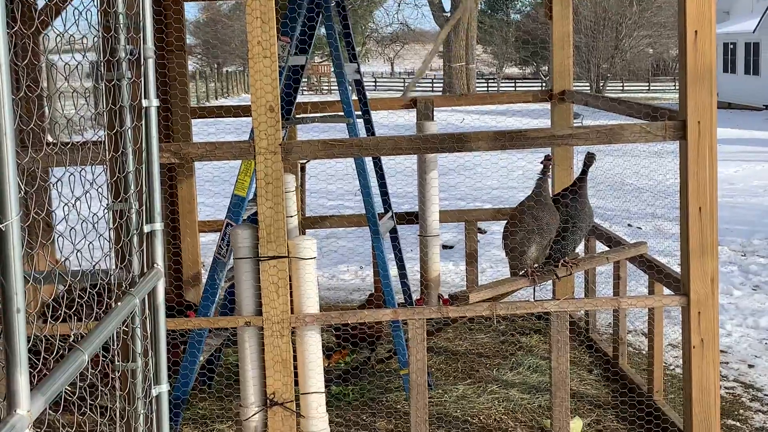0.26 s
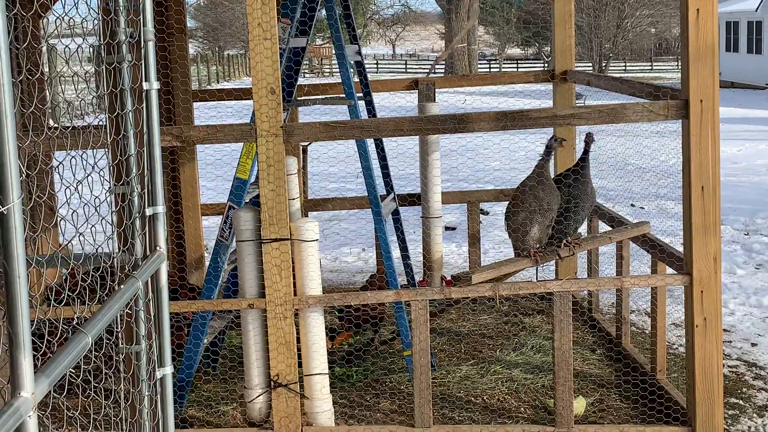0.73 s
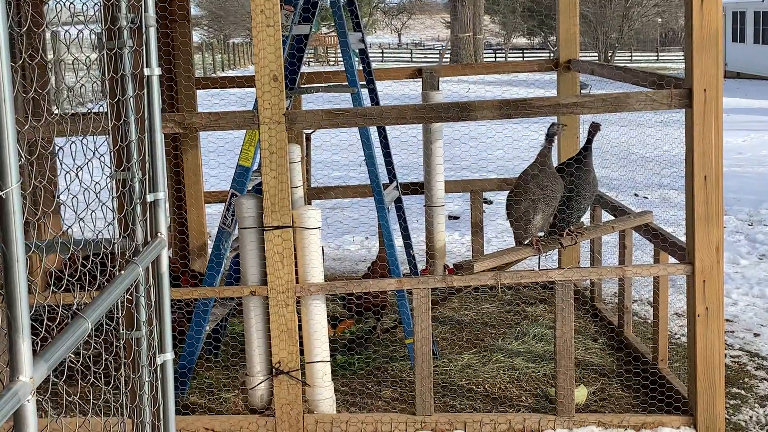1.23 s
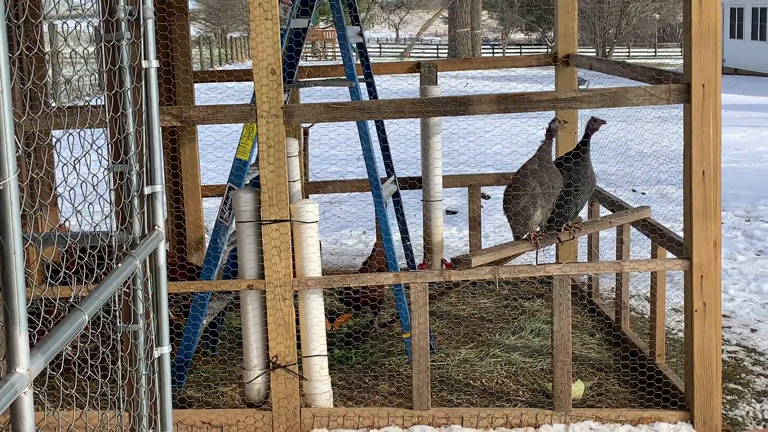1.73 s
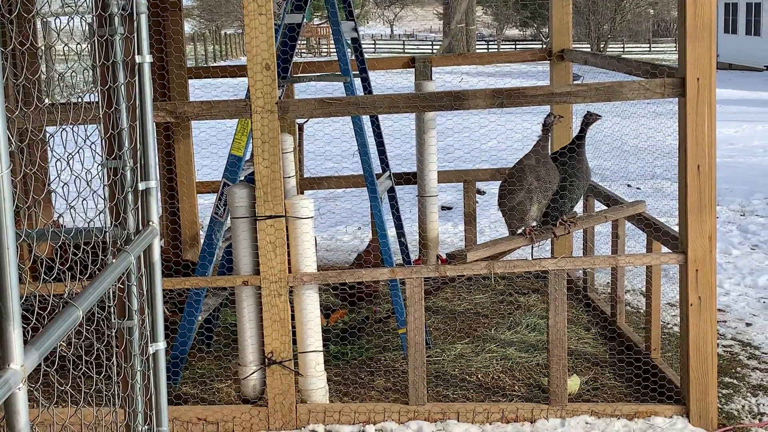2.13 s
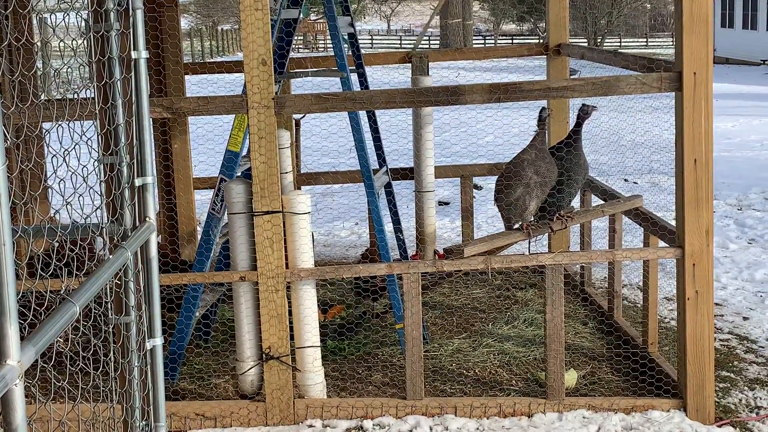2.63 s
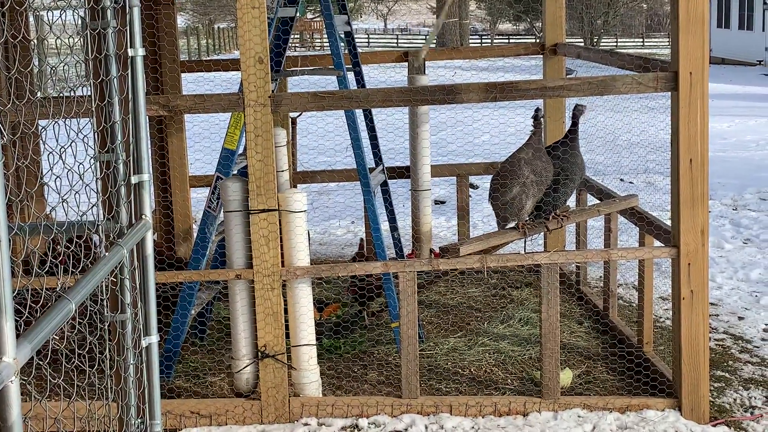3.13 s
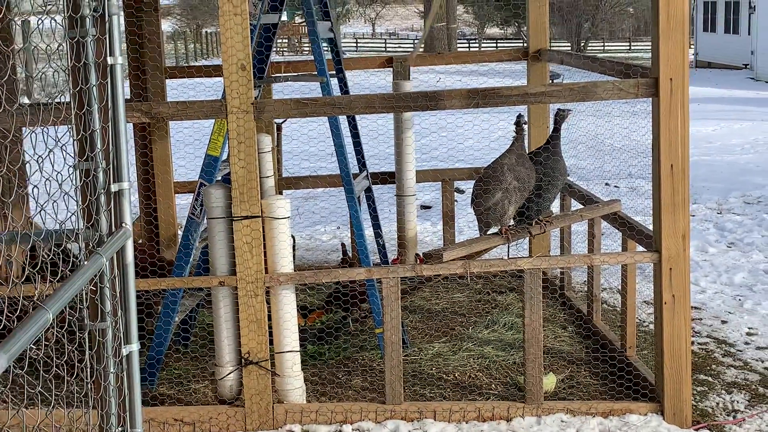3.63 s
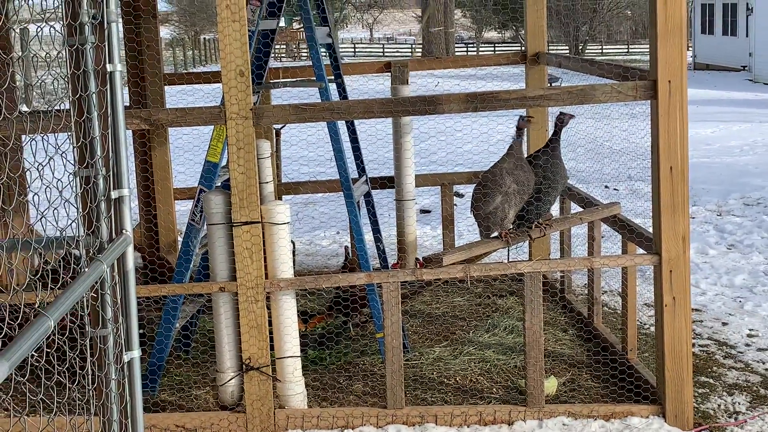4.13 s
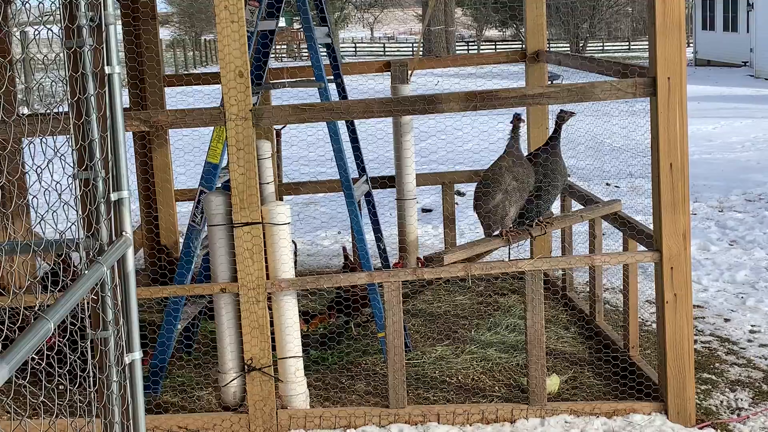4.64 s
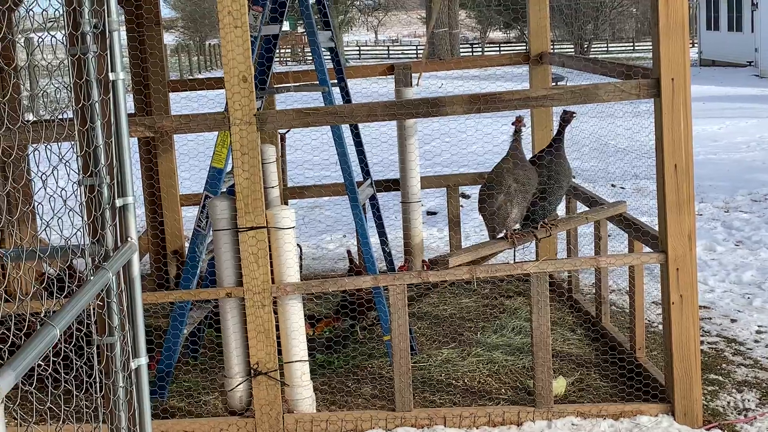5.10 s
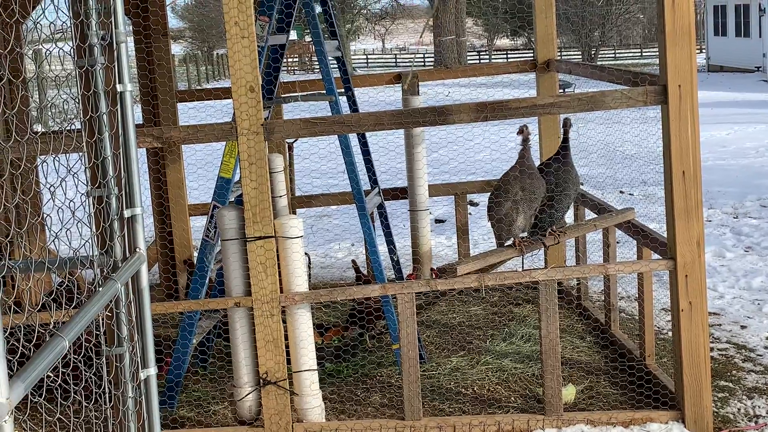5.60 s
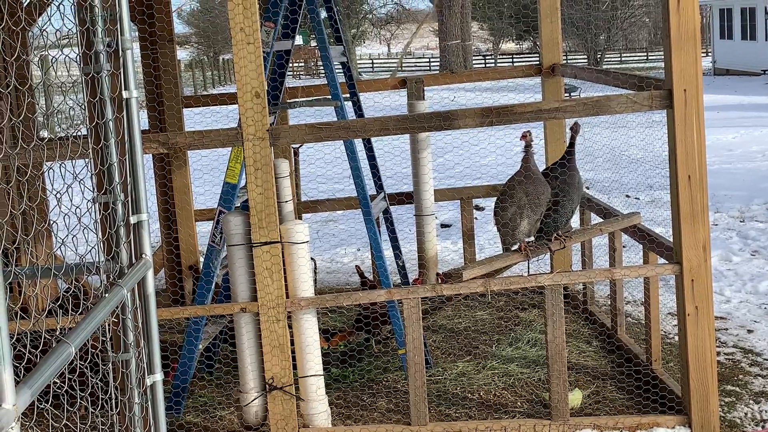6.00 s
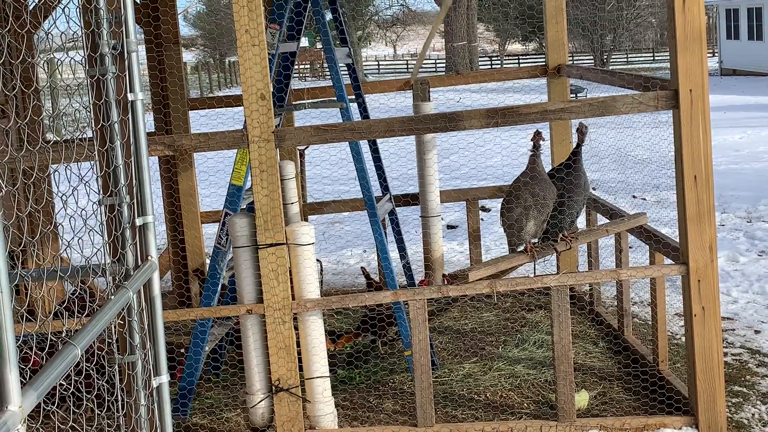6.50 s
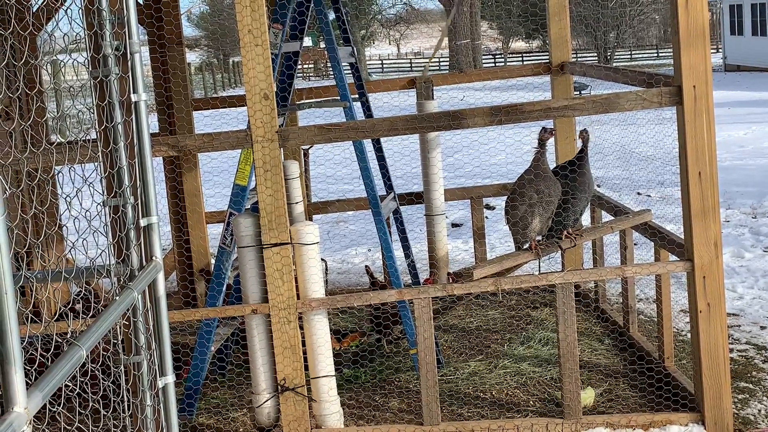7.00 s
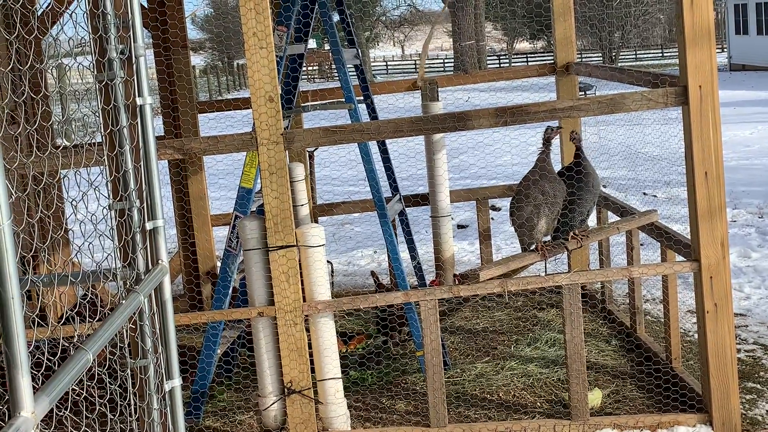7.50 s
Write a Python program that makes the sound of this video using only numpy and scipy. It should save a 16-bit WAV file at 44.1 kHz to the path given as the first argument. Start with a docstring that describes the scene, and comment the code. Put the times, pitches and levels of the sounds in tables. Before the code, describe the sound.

Raspy guinea fowl calls, about four or five a second, slacken and pick up again over regular soft hen squawks, wind rumble and small ticks.

```python
"""Light wind, lumpy low noise with gusts and falling pops, and faint yard air run from the start.
Guinea fowl on a rail in a wire run call harsh notes at once: uneven pulses with breath over a clean tone.
The wooden run answers briefly and the yard longer, as decaying noise tails.
Almost from the start a hen below squawks in a steady rhythm, with a few short clucks between: partials at
thirds of her pitch. From half a second on, small ticks come from close by: high-passed noise bursts."""
import sys
import numpy as np
from scipy import signal
from scipy.fft import rfft, irfft
from scipy.io import wavfile
from scipy.ndimage import uniform_filter1d, minimum_filter1d

SR = 44100
rng = np.random.default_rng(int(sys.argv[2]) if len(sys.argv) > 2 else 0)


def unload_wav(signal):
    """Save mono or channel-first audio to the path in sys.argv[1] as 16-bit WAV at rate SR, clipped to [-1, 1]."""
    wavfile.write(
        sys.argv[1],
        SR,
        np.round(np.clip(np.atleast_2d(signal).T, -1, 1) * 32767).astype(np.int16),
    )


N = 341775
TIME_S = np.arange(N) / SR
HZ = np.fft.rfftfreq(N, 1 / SR)

# Wind rumble between gusts. Each row: time in seconds, level in dB before the lumps.
WIND_LEVEL = [(0.0, -61), (0.64, -53), (0.99, -58), (1.68, -52.5), (2.16, -59.5), (2.65, -49), (3.5, -59.5),
              (5.85, -62.5), (6.02, -57.5), (7.75, -66)]
# Wind spectrum. Each row: frequency in Hz, relative level in dB.
WIND_SPECTRUM = [(11, 9), (18, -28), (38, -4), (59, 8), (98, 3), (254, -34.5), (273, -30.5), (300, -20.5),
                 (390, -44.5), (660, -120)]
# Gusts. Each row: start in seconds, level in dB before GUST_CREST_DB is taken off.
GUSTS = [(0.492, -34), (0.819, -44.5), (1.148, -41), (1.302, -43), (1.716, -37), (2.324, -45), (2.492, -38),
         (2.943, -31.5), (3.112, -41), (4.844, -45), (5.833, -49), (5.999, -56), (6.195, -49),
         (7.185, -46.5)]
# Gusts that pop on the ports. Each row: start in seconds, level in dB, time scale in seconds.
POPS = [(0.504, -47, 0.058), (1.741, -43.5, 0.058), (2.477, -40.5, 0.043), (2.903, -48, 0.05),
        (3.11, -50.5, 0.0554), (4.582, -59, 0.045)]
GUST_RISE_S, GUST_CREST_DB, LUMPY_DB = 0.02, 4.5, 6.5
POP_START_HZ = 249

# Yard air spectrum. Each row: frequency in Hz, relative level in dB.
AIR_SPECTRUM = [(90, -27.5), (150, -6), (260, -16.5), (400, -15), (600, -20.5), (900, -20), (2700, -13.5),
                (3500, -53), (6000, -25), (8500, -64.5), (10500, -26.5), (15700, -65)]
AIR_DB = -61

# Guinea fowl notes. Each row: time in seconds, nominal peak in dB, treble in dB, start pitch in Hz,
# growl at a third of the pitch in dB, rise in seconds, length in seconds.
GUINEA_NOTES = [(0.0161, -12.5, 1.5, 1145, -30, 0.02, 0.053), (0.1337, -15, 2.5, 1150, -21, .023, 0.064),
                (0.2801, -17.5, 9, 1070, -34.5, 0.012, .073), (0.5625, -14, 7, 1081, -43, 0.032, 0.087),
                (0.7258, -13, -2.5, 1096, -31, 0.025, 0.086), (0.8895, -17, 0.5, 1089, -29.5, 0.011, 0.099),
                (1.1138, -18.5, 1, 1071, -46, 0.021, 0.088), (1.305, -19, 2, 1072, -33.5, 0.036, .085),
                (1.491, -19.5, -2, 1083, -26, 0.038, 0.1), (1.7396, -20, -1, 1045, -43, .034, 0.082),
                (2.0884, -23, -1, 1022, -44.5, 0.014, 0.071), (2.3019, -18, -8, 1089, -29.5, 0.039, 0.082),
                (2.585, -23, -0.5, 1021, -46.5, 0.036, 0.089), (2.9374, -18, -7, 1066, -39.5, 0.046, 0.086),
                (3.7353, -20.5, 3, 1008, -54, 0.023, 0.078),
                (3.9475, -18.5, 1.5, 1094, -40.5, 0.038, 0.081),
                (4.156, -18.5, 2.5, 1076, -30.5, 0.026, 0.083), (4.4928, -21, 8, 1018, -49, 0.022, 0.088),
                (4.6464, -13.5, 5.5, 1086, -28.5, 0.027, 0.079),
                (4.819, -18.5, 6.5, 1131, -29.5, 0.021, 0.094), (4.9915, -18, 4, 1121, -27, .016, 0.09),
                (5.206, -16, 2.5, 1040, -29.5, .022, .09), (5.4096, -13.5, 2, 1072, -25.5, .023, 0.095),
                (5.619, -13.5, 5.5, 1081, -41, 0.026, 0.086), (5.929, -19, 5, 1019, -50.5, 0.013, .084),
                (6.1573, -15.5, 3, 1080, -31, 0.036, 0.11), (6.3864, -16.5, 4, 1090, -30, .023, 0.089),
                (6.6145, -16.5, 2.5, 1057, -28.5, .033, 0.093), (6.9234, -18, 3, 1034, -46.5, .025, 0.1),
                (7.163, -17, -.5, 1153, -26.5, 0.031, .098), (7.485, -23, -0.5, 1067, -24.5, 0.022, 0.073),
                (7.7455, -21, 4.5, 1163, -24, 0.041, 0.1)]
# Guinea fowl throat and microphone. Each row: frequency in Hz, relative gain in dB.
GUINEA_THROAT = [(150, -79), (250, -36), (379, 3), (695, -12.5), (949, -5.5), (1230, -9.5), (2030, -4.5),
                 (3420, -3), (4830, -2.5), (5360, -21.5), (6060, -33), (8560, -11.5), (10500, -11),
                 (13400, -35), (15700, -50)]
# Resonances on the way out. Each row: frequency in Hz, width in Hz, mean lift in dB.
RESONANCES = [(1536, 40, 7), (1738, 80, 7.5), (2296, 69, -1), (2652, 414, 12), (2900, 110, 5.5),
              (3456, 108, 11), (3918, 59, 4), (4220, 15, 8.5), (4820, 39, 5), (6003, 394, 22.5),
              (15190, 1610, 24)]
CREST_DB = 2.5  # peaks of a harsh note above its mean level
FULL_STRESS_DB = -30  # growl level at which one pulse in three carries the note
END_HZ = 930.7  # pitch towards which notes move
ROUGHNESS = .6  # hoarseness of a full growl
CLEAR_SHARE, CLEARING = .6, .4  # hoarseness left without growl; share lost by the end of a note
TONE_DB, TONE_LOSS_DB = -31.5, 3  # clean tone, independent of effort; loss per unit of growl
TONE_FLICKER_DB, TONE_DECAY_S = 3.0, 0.27
CHEST_DB, CHEST_LOSS_DB = -13.5, 2  # lower throat, likewise

# Little is radiated between growl and tone. Each row: frequency in Hz, gain in dB.
HOLLOW = [(430, -3), (500, -11), (740, -5.5), (820, 0)]
# Reflecting surfaces of run and yard. Each row: frequency in Hz, relative gain in dB.
RUN_WALLS = [(300, -3), (800, 1), (4000, 2.5), (7000, -4), (11000, -11.5), (16000, -3)]
YARD_WALLS = [(300, -10), (800, -0.5), (4500, 1.5), (7000, -7), (11000, -26), (16000, -10)]
RUN_T60_S, RUN_DELAY_S, RUN_DB = 0.14, 0.002576, -3
YARD_T60_S, YARD_DELAY_S, YARD_DB = 0.69, 0.027, -18

# Hen clucks. Each row: start in seconds, level in dB.
CLUCKS = [(0.102, -35.5), (2.478, -37), (3.241, -37), (4.075, -35.5)]
# Course of every cluck. Each row: age in seconds, pitch in Hz before the onset drop, level in dB,
# thirds relative to the tone in dB, throat opening in dB, beak resonance in Hz.
CLUCK_COURSE = [(0, 970, -10.5, -6, 7.5, 1260), (.01, 940, -2.5, -22, -19, 1270),
                (0.016, 880, 4, -4.5, -10.5, 1280), (0.043, 870, -19.5, -13, 8, 1454)]
# Hen squawks. Each row: start in seconds, length in seconds, level in dB, held pitch in Hz, top pitch in Hz,
# share of the length at which the top is reached, beak resonance gained by the end in Hz.
SQUAWKS = [(0.27, 0.21, -35.5, 875, 962.5, 0.76, 66), (1.068, 0.21, -35, 867.2, 946, 0.66, -49),
           (1.911, 0.22, -36.5, 864.7, 974, 0.72, 89.5), (2.668, 0.21, -36, 859, 996, .6, 4.5),
           (3.436, 0.22, -36.5, 872, 969.7, 0.76, -85), (4.267, 0.22, -35.5, 869.4, 965, 0.68, 29),
           (5.046, 0.24, -33.5, 883, 945.5, 0.718, 26), (5.814, 0.22, -34, 877, 945, 0.78, 88),
           (6.612, 0.2, -33, 886.5, 943.5, 0.72, 217), (7.412, 0.21, -31.5, 883, 958.6, 0.75, -58)]
# Course of every squawk. Each row: share of its length, pitch from 0 held to 1 top, level in dB,
# thirds relative to the tone in dB, throat opening in dB, beak resonance in Hz.
SQUAWK_COURSE = [(0, 1.093, -12.5, -8.5, 5, 1285), (.08, 0.574, 1.5, -7.5, -9, 1360),
                 (0.149, 0.0013, 3, -11.5, -8.5, 1200), (0.302, 0, -1.5, -20, -3.5, 1600),
                 (.48, .12, 5, -4.5, -7, 1485), (.7, .95, 2.5, -4.5, -4, 1680),
                 (0.859, 0.53, -2, 7.5, 4, 1646), (.93, 0.424, 1, -1, 2.5, 1980),
                 (1, 0.81, -22, -10, 2.5, 1830)]
# Hen throat. Each row: frequency in Hz, relative gain in dB.
HEN_THROAT = [(250, -86), (320, 6), (620, 0.5), (900, 10), (1200, 2.5), (1600, -1), (2000, -2.5),
              (2600, -11), (4500, -14), (6000, -32.5), (10500, -19), (15500, -40.5)]
USUAL_TOP_SHARE = .7  # where the shared course has its top
HEN_PARTIALS = 52

# Ticks. Each row: time in seconds, nominal level in dB.
TICKS = [(0.4991, -46), (2.4526, -45), (3.0934, -28), (3.1675, -43), (4.3659, -33), (4.9375, -31),
         (7.3507, -39)]

# Two microphone ports. Each row: frequency in Hz, phase by which left leads in radians.
PORT_PHASE = [(0, 0), (2070, -0.1), (2760, -4.4), (4740, -6.7), (5250, -8.9), (6720, -5.7), (7670, -9.2),
              (8870, -9.4), (10400, -12.4), (11600, -12.7), (12700, -15.5), (14400, -16.1), (15200, -19.0),
              (16400, -18.7)]
LIMIT = .5  # peak height held by the limiter
CUTOFF_HZ = 15800


def from_db(db):
    """Gain of a level."""
    return 10 ** (np.asarray(db) / 20)


def rms_one(x):
    """Scale to unit power."""
    return x / np.sqrt(np.mean(x ** 2) + 1e-20)


def at_hz(points, hz):
    """Read a spectrum table on a log-frequency axis."""
    table = np.array(points)
    return np.interp(np.log(hz + 1), np.log(table[:, 0] + 1), table[:, 1])


def colour(x, spectrum):
    """Filter by a spectrum table, zero phase."""
    return irfft(rfft(x) * from_db(at_hz(spectrum, HZ)), N)


def drift(rate_hz):
    """Slow random course of unit power, clipped at 2.2."""
    slow = irfft(rfft(rng.standard_normal(N)) / (1 + (HZ / rate_hz) ** 2), N)
    return np.clip(rms_one(slow), -2.2, 2.2)


def high_pass(x, cutoff_hz):
    """Second-order high-pass."""
    return signal.sosfilt(signal.butter(2, cutoff_hz, "high", fs=SR, output="sos"), x)


def wind():
    """Lumpy low noise swelling in gusts, plus damped pops of falling pitch; alike on both sides."""
    s, level_db = np.transpose(WIND_LEVEL)
    strength = from_db(np.interp(TIME_S, s, level_db) + LUMPY_DB * drift(14))
    for s, gust_db in GUSTS:
        age = np.clip(TIME_S - s, 0, 1) / GUST_RISE_S
        strength += from_db(gust_db - GUST_CREST_DB) * age * np.exp(1 - age)
    out = strength * rms_one(colour(rng.standard_normal(N), WIND_SPECTRUM))
    for s, pop_db, scale_s in POPS:
        age = np.clip(TIME_S - s, 0, 1) / scale_s
        envelope = from_db(pop_db) * age * np.exp(1 - 1.9 * age)
        out += envelope * np.sin(2 * np.pi * POP_START_HZ * scale_s * np.log(1 + age))
    return out


def yard_air():
    """Steady coloured noise, wide above 400 Hz."""
    mid, side = rng.standard_normal((2, N))
    wide = high_pass(side, 400)
    return from_db(AIR_DB) * rms_one(colour(mid + wide * [[1], [-1]], AIR_SPECTRUM))


def resonances(x):
    """Narrow resonances lift what passes them, each by a slowly and randomly changing amount."""
    out = x.copy()
    for hz, width_hz, lift_db in RESONANCES:
        r = np.exp(-np.pi * width_hz / SR)
        feedback = [1, -2 * r * np.cos(2 * np.pi * hz / SR), r * r]
        rung = signal.lfilter([(1 - r * r) / 2, 0, (r * r - 1) / 2], feedback, x + 1e-18)
        out += from_db(lift_db + 3 * drift(8)) * rung
    return out


def guinea_fowl():
    """Uneven syrinx pulses, breath noise in each, through the throat; a clean tone lingers under them."""
    shape, stress, rough, tone, treble, chest, edge = np.zeros((7, N))
    pitch_hz, tone_hz = np.full((2, N), 1000.)
    for s, peak_db, treble_db, start_hz, growl_db, rise_s, length_s in GUINEA_NOTES:
        growl = from_db(growl_db - FULL_STRESS_DB)
        here = (TIME_S > s - .02) & (TIME_S < s + .16)
        age_s = np.clip(TIME_S[here] - s + .018, 0, None)
        share = np.clip(age_s / length_s, 0, 1)

        swell = np.clip(age_s / max(rise_s + 0.0088, .005), 0, 1) ** 1.9
        fade = 1 / (1 + np.exp((age_s - length_s) / 0.0094))
        shape[here] = from_db(peak_db - CREST_DB) * swell * fade * np.exp(-age_s / 0.097)
        tone_swell = np.clip(age_s / 0.019, 0, 1) ** 1.9
        tone_gain = from_db(TONE_DB - TONE_LOSS_DB * growl)
        tone[here] = tone_gain * tone_swell * fade * np.exp(-age_s / TONE_DECAY_S)

        fall_hz = (END_HZ - start_hz) * share
        scoop_hz = 90 * np.exp(-age_s / .015) * max(1 - growl, 0)  # clear notes drop in from above
        # in a growl the tone breaks downward
        jump_hz = (END_HZ - start_hz) / (1 + np.exp((.6 * length_s - age_s) / 0.0029))
        tone_hz[here] = start_hz + scoop_hz + (jump_hz if growl > .6 else fall_hz)
        # growled notes hold their pitch more
        pitch_hz[here] = start_hz + scoop_hz + fall_hz * np.clip(1 - .75 * growl, .2, 1)

        stress[here] = growl
        hoarse = ROUGHNESS * min(CLEAR_SHARE + (1 - CLEAR_SHARE) * growl, 1.05)
        rough[here] = hoarse * (1 - CLEARING * share ** 2)
        treble[here] = from_db(treble_db) * np.exp(-age_s / 0.23)
        # the bright rasp comes late and leaves early
        edge[here] = 2.07 * np.clip(age_s / 0.045, .3, 1) * np.exp(-age_s / 0.094)
        # the lower throat grows as the beak closes
        chest[here] = from_db(CHEST_DB - CHEST_LOSS_DB * growl - peak_db) * (0.76 + age_s / 0.15)

    cycles = np.cumsum(pitch_hz * (1 + .05 * rough * drift(300))) / SR
    count = np.floor(cycles).astype(int)
    closing = np.diff(count, prepend=0) > 0
    uneven = .6 * rough * rng.standard_normal(count.max() + 1)[count]
    size = 1 + uneven + stress * (count % 3 - 1) * 1.2
    size = np.clip(size, -.6, 2.4)  # kept within a range, so that no single pulse sticks out
    breath = .38 * rough * rng.standard_normal(N) * np.exp(-(cycles % 1) / .4) * np.abs(size)
    voice = resonances(colour(size * closing + breath, GUINEA_THROAT))
    voice /= np.sqrt(uniform_filter1d(voice ** 2, size=1500))

    top = colour(voice, [(6000, -40), (8500, 0)])
    low = colour(voice, [(900, -30), (1300, 0), (2300, 0), (3000, -30)])
    rasp = colour(voice, [(2400, -30), (3200, 0), (6000, 0), (8500, -40)])
    grain = from_db(1.5 * drift(40))  # the treble comes in patches
    throb = from_db(2.54 * drift(91))  # the syrinx stutters within a note
    harsh = voice + (treble * grain - 1) * top + (chest - 1) * low + (edge - 1) * rasp
    clean = np.sin(2 * np.pi * np.cumsum(tone_hz * (1 + 0.0065 * drift(48.0))) / SR)
    return harsh * shape * throb + tone * clean * from_db(TONE_FLICKER_DB * drift(60))


def echoes(x, t60_s, delay_s, walls):
    """Dense reflections decaying exponentially, independent per side, coloured by what reflects them."""
    decay = from_db(-60 * TIME_S[:SR] / t60_s) * (TIME_S[:SR] > delay_s)
    tail = rng.standard_normal((2, SR)) * decay
    tail /= np.sqrt((tail ** 2).sum(axis=1, keepdims=True))
    return signal.fftconvolve(colour(x, walls)[None], tail, axes=1)[:, :N]


def hen_calls():
    """Clucks keep their course; each squawk stretches the shared one to its length, pitches and beak."""
    age_s, pitch_hz, level_db, *rest = np.transpose(CLUCK_COURSE)
    calls = [(s + age_s, pitch_hz, call_db + level_db, *rest) for s, call_db in CLUCKS]
    share, climb, level_db, thirds_db, open_db, beak_hz = np.transpose(SQUAWK_COURSE)
    for s, length_s, call_db, held_hz, top_hz, top_share, gained_hz in SQUAWKS:
        times_s = s + length_s * np.interp(share, [0, USUAL_TOP_SHARE, 1], [0, top_share, 1])
        pitch_hz = held_hz + climb * (top_hz - held_hz)
        calls.append((times_s, pitch_hz, call_db + level_db, thirds_db, open_db,
                      beak_hz + share * gained_hz))
    return calls


def hen():
    """A clear tone whose cycles group in threes: partials at thirds of the pitch, hoarser as they grow."""
    out = np.zeros(N)
    wobble = drift(140)
    hoarse = rng.standard_normal((HEN_PARTIALS, N // 100 + 2))
    croak = drift(31)  # strained parts come in lumps
    k = np.arange(1, HEN_PARTIALS + 1)[:, None]  # k = 3 is the tone
    for s, *columns in hen_calls():
        here = (TIME_S > s[0] - .005) & (TIME_S < s[-1] + .01)
        t = TIME_S[here]
        pitch_hz, call_db, thirds_db, open_db, beak_hz = [np.interp(t, s, c) for c in columns]
        strain = np.clip(from_db(thirds_db), 0, 1) ** 1.5
        pitch_hz = pitch_hz * (1 + 0.111 * np.exp(-(t - t[0]) / 0.01115))  # drops in from above
        turn = 2 * np.pi * np.cumsum(pitch_hz * (1 + .022 * strain * wobble[here])) / SR / 3

        hz = k * pitch_hz / 3
        grouping_db = thirds_db * (k % 3 > 0) * (1 + 1.6 * (k < 3))
        level_db = at_hz(HEN_THROAT, hz) + grouping_db + open_db * (k > 3)
        # a resonance that moves as the beak opens
        beak = 1 + 8.1 * (k != 3) / (1 + ((hz - beak_hz) / 130) ** 2)
        heights = from_db(level_db) * beak
        heights /= np.sqrt((heights ** 2).sum(axis=0))

        flutter = np.array([np.interp(t * SR / 100, np.arange(len(h)), h) for h in hoarse])
        unsteady = 1 + (.7 * strain + k / 40) * (k > 3) * flutter
        partials = heights * unsteady * np.sin(k * turn + k * k)
        edge = np.clip(np.minimum(t - t[0], t[-1] - t) / 0.021, 0, 1)
        lumps = from_db(3.5 * strain ** 2 * croak[here])
        out[here] += np.sqrt(2) * from_db(call_db) * edge * lumps * partials.sum(axis=0)
    return out


def ticks():
    """Noise bursts with a decay constant of 0.8 ms, high-passed."""
    clicks = np.zeros(N)
    for s, level_db in TICKS:
        clicks[round(s * SR)] = from_db(level_db)
    decay = signal.lfilter([1], [1, -np.exp(-1 / (.0008 * SR))], clicks)
    return high_pass(decay * rng.standard_normal(N), 3000)


def scene():
    """Birds and ticks reach the two ports with a phase difference; echoes and air are wide."""
    birds = colour(guinea_fowl() + hen(), HOLLOW)
    half = np.exp(.5j * at_hz(PORT_PHASE, HZ))
    ports = irfft(rfft(birds + ticks()) * np.array([half, 1 / half]), N)
    direct = ports * from_db([[-.4], [.4]])
    run = from_db(RUN_DB) * echoes(birds, RUN_T60_S, RUN_DELAY_S, RUN_WALLS)
    yard = from_db(YARD_DB) * echoes(birds, YARD_T60_S, YARD_DELAY_S, YARD_WALLS)
    return direct + run + yard + yard_air() + wind()


def record(dry):
    """A quick limiter shared by both sides, then a steep low-pass."""
    gain = minimum_filter1d(LIMIT / np.maximum(np.abs(dry).max(axis=0), LIMIT), size=301)
    held = dry * uniform_filter1d(gain, size=301)
    return signal.sosfilt(signal.ellip(10, .5, 75, CUTOFF_HZ, fs=SR, output="sos"), held)


dry = scene()
out = record(dry)
unload_wav(out)
```